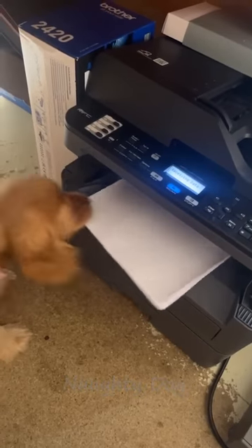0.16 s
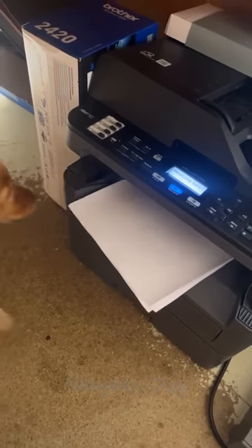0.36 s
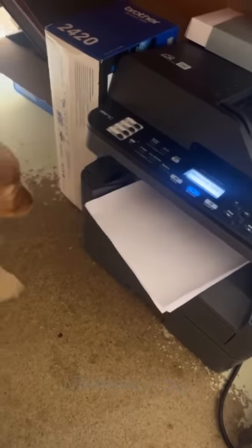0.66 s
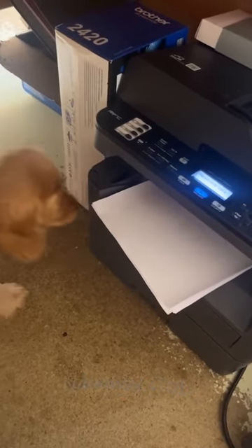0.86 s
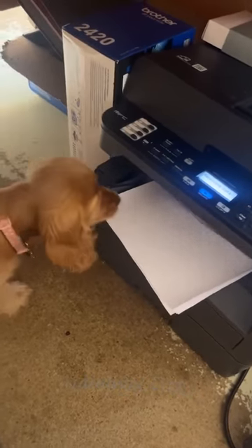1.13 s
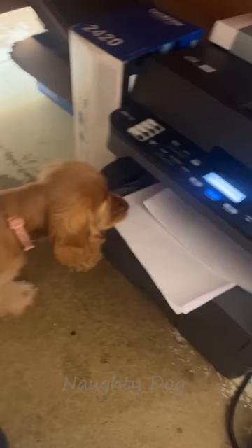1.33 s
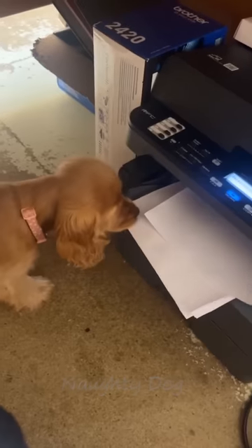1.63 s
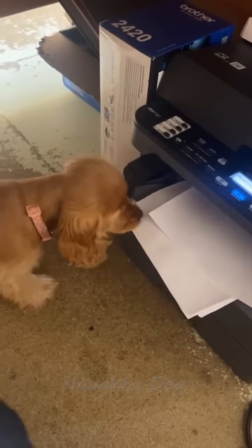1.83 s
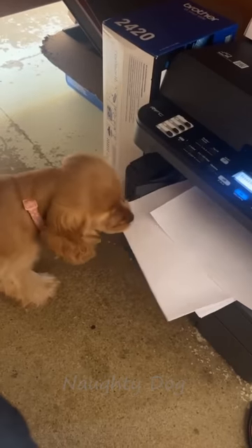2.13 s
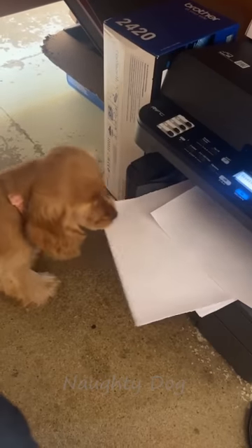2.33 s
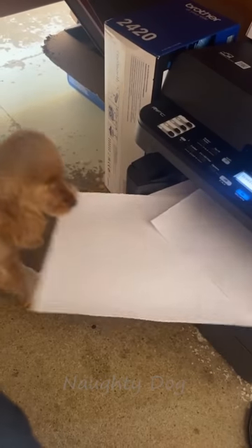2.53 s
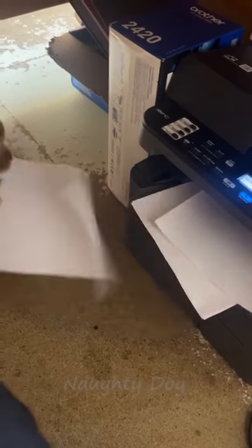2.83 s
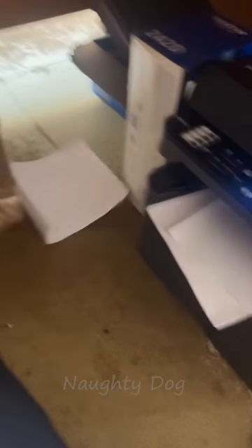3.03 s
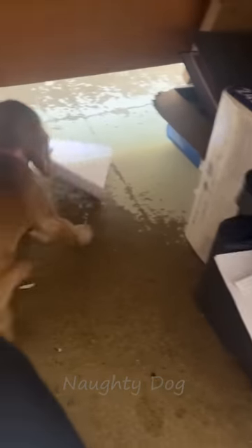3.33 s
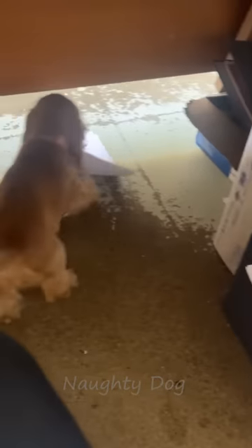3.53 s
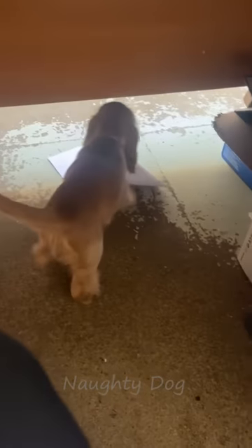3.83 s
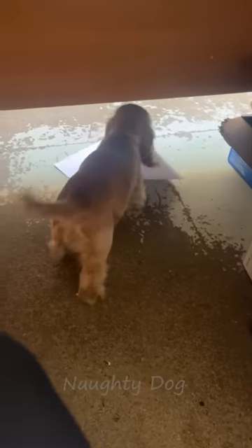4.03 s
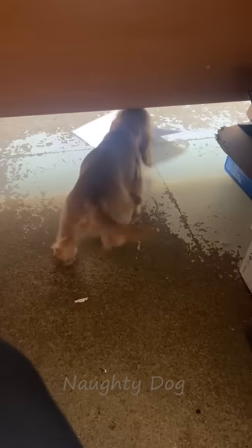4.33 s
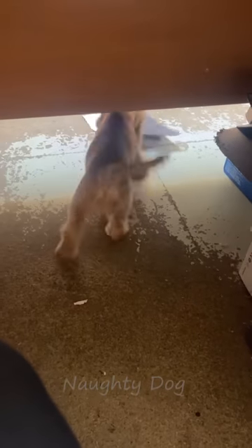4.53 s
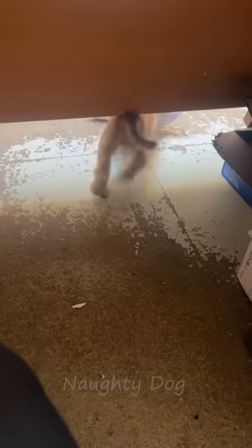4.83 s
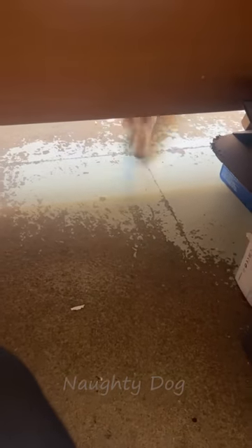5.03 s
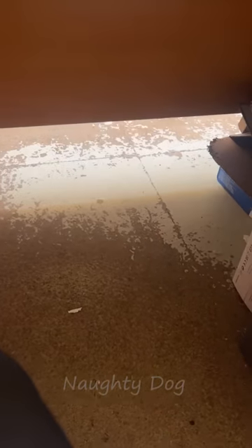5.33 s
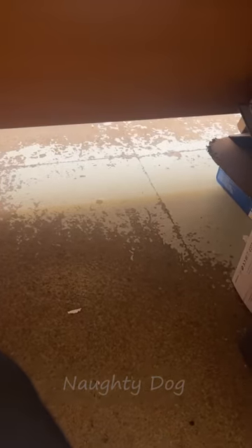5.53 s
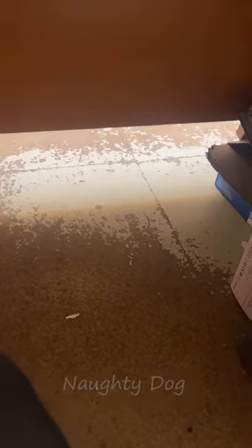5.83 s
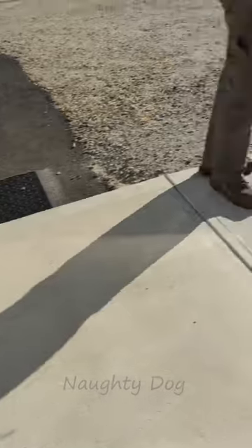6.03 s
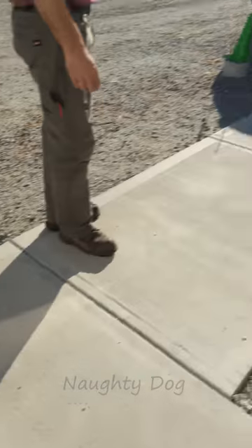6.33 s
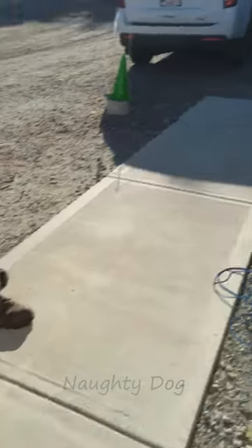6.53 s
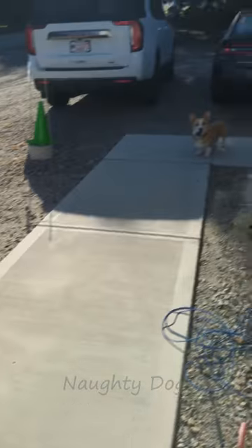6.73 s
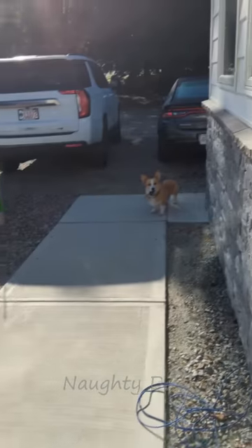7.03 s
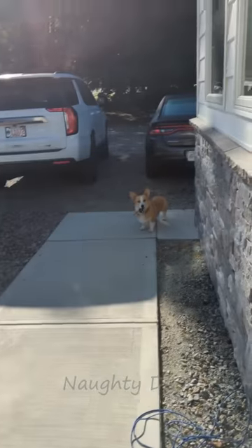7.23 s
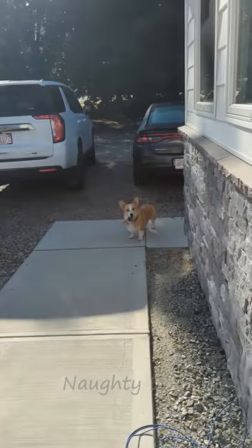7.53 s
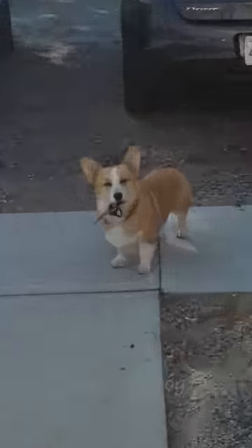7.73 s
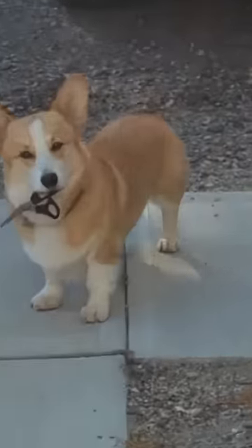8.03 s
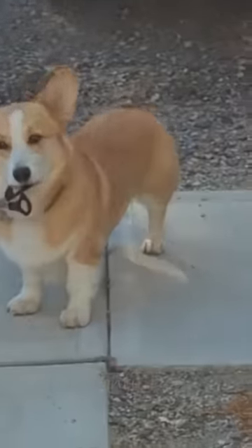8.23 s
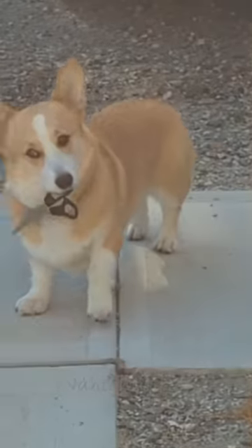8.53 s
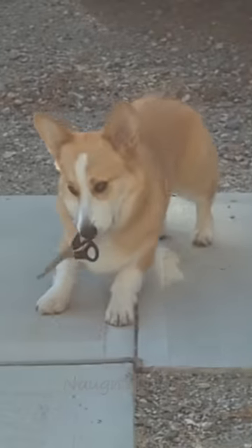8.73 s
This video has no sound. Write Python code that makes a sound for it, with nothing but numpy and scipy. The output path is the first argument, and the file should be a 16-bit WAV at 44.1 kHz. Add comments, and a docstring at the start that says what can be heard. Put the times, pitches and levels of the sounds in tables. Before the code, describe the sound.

From 0 to 6 s, a printer runs close by in a small hard room: a low, unsteady motor hum, casing rumble, fan air and wavering treble hiss, in mono. Over it, paper rasps and slaps in a hollow plastic tray: a quick scrape and clatter at 0.3 s, more at 0.85 to 1.2, a drier rasp at 1.5 to 1.7, soft rubbing and a dull bump around 2, light slides near 2.7. A very sharp tick at 2.9 briefly ducks everything. Clacks follow at 3.4 and 3.6, stronger at 3.75 and 4.25, the last with a lower knock; then mainly hum, slightly weaker, with a faint brush at 5.2. At 5.96 it cuts to quiet, wide stereo driveway air: faint gliding bird whistles from 6.05 to 6.5, a gritty scuff at 6.45, a soft thump at 6.9. An engine's low idle and whirring air swell, jumping fuller around 7.4 and loudest from 8 to 8.8.

```python
"""Puppy at the printer tray, then a driveway

An office printer hums and blows in a small hard room: drifting tones over coloured noise.
Sheets rasp and slap in its plastic tray as a puppy tugs one out: stick-slip noise and short damped modes.
One sharp tick right by the microphone makes the limiter duck.
Then a cut to a driveway: a far bird whistles in glides, and a faint engine rumble grows as the camera zooms in.
"""
import sys
import numpy as np
from scipy import signal
from scipy.fft import rfft, irfft, next_fast_len
from scipy.io import wavfile
from scipy.ndimage import uniform_filter1d, minimum_filter1d, map_coordinates

SR = 44100
rng = np.random.default_rng(int(sys.argv[2]) if len(sys.argv) > 2 else 0)


def bounce(signal):
    """Save signal as a 16-bit WAV file at the path given by the first command-line argument."""
    frames = np.transpose(np.atleast_2d(signal))
    limited = np.clip(frames, -1, 1)
    pcm = np.round(limited * 32767).astype(np.int16)
    wavfile.write(sys.argv[1], SR, pcm)


N = 391608
CUT_S, ZOOM_S = 5.957, 7.33  # the cut from the room to the driveway; the start of the zoom there


def amp(db):
    """Decibels to gain."""
    return 10 ** (np.asarray(db) / 20)


def unit(x):
    """Scale to rms 1."""
    return x / np.sqrt(np.mean(np.abs(x) ** 2) + 1e-20)


def clock():
    """The time of every sample in seconds."""
    return np.arange(N) / SR


def since_cut():
    """Seconds spent on the driveway, zero before the cut."""
    return np.maximum(clock() - CUT_S, 0)


def along(points, hz):
    """Read (Hz, value) points on a log frequency axis."""
    f, v = np.transpose(points)
    return np.interp(np.log(hz + 1), np.log(f + 1), v)


def curve(points):
    """Read (s, value) points at every sample."""
    s, v = np.transpose(points)
    return np.interp(clock(), s, v)


def wobble(rate):
    """A smooth random curve, rate knots a second."""
    knots = rng.standard_normal(int(N * rate / SR) + 4)
    return map_coordinates(knots, [clock() * rate])


def filtered(x, response):
    """x times a response of frequency."""
    m = next_fast_len(N + SR // 2)
    return irfft(rfft(x, m) * response(np.fft.rfftfreq(m, 1 / SR)), m)[..., :N]


def noise(spectrum):
    """Noise of rms 1 with the given colour."""
    return unit(filtered(rng.standard_normal(N), lambda hz: amp(along(spectrum, hz))))


def resonate(x, modes):
    """x through a body's resonances, which alternate in sign, at rms 1."""
    def body(f):
        total = 0
        for k, (centre, width, db) in enumerate(modes):
            damping = 1j * f * width
            total = total + (-1) ** k * amp(db) * damping / (centre * centre - f * f + damping)
        return total
    return unit(filtered(x, body))


def tone(hz, unsteady, rate):
    """A line of rms 1 at a fixed or moving pitch; a share of it drifts in strength and phase."""
    share = np.clip(unsteady, 0, 1)
    drift = np.sqrt(1 - share ** 2) + share * unit(wobble(rate) + 1j * wobble(rate))
    turns = np.cumsum(hz * np.ones(N)) / SR + rng.random()
    return unit(np.real(drift * np.exp(2j * np.pi * turns)))


def walls(x, count=12):
    """Near walls add weak early copies, which ripple the spectrum of a steady sound."""
    share, span_s = 0.3, 0.03  # strength of all copies together; the latest possible copy
    copies = [rng.choice([-1, 1]) * np.roll(x, int(SR * span_s * u)) for u in rng.uniform(.15, 1, count)]
    return x + share * sum(copies) / np.sqrt(count)


def bumps(rows):
    """Brief dull booms, each a low sine under a bell-shaped swell."""
    t = clock()
    total = np.zeros(N)
    for s, hz, db, half in rows:
        total += amp(db) * np.exp(-((t - s) / half) ** 2) * np.sin(2 * np.pi * hz * (t - s))
    return total


def patchy(x, depth_db):
    """Turbulence: random patches of gain, about 300 Hz wide and 70 ms long."""
    z = signal.stft(x, nperseg=1024)[2]
    field = uniform_filter1d(rng.standard_normal(z.shape), size=7, axis=0)
    field = uniform_filter1d(field, size=6, axis=1)
    return unit(signal.istft(z * amp(depth_db * unit(field)), nperseg=1024)[1][:N])


def rush(colour):
    """Coloured noise rippled by near walls and made patchy by turbulence."""
    return patchy(walls(walls(noise(colour))), depth_db=1.6)


def brightening(x):
    """A steep upper edge that climbs from the start of the zoom onwards."""
    start_hz, climb_hz_per_s = 2930, 380
    hz, t, z = signal.stft(x, SR, nperseg=1024)
    edge_hz = start_hz + climb_hz_per_s * np.maximum(t - ZOOM_S, 0)
    return unit(signal.istft(z / (1 + (hz[:, None] / edge_hz) ** 16), SR, nperseg=1024)[1][:N])


def opening():
    """Gain of the open air as it fades in after the cut."""
    return 1 - 0.93 * np.exp(-since_cut() / 0.12)


def layer_level(mean_db, follows, lift_db):
    """A layer's gain: its dB at the mean swell, dB per dB of swell, and dB lifted by the zoom."""
    # how the driveway's sound grows: t/s, level/dB (only the change from the mean counts)
    swell = [(6.0, -69.5), (6.72, -57), (7.35, -52.5), (8.15, -44), (8.52, -41.5), (8.8, -42)]
    swell_db = curve(swell)
    swell_db = swell_db - swell_db[since_cut() > 0].mean()
    zoomed = np.clip((clock() - ZOOM_S) / 0.082, 0, 1)
    return opening() * amp(mean_db + follows * swell_db + lift_db * zoomed)


def driveway_air():
    """Engine body, fan whirr and hiss as rushing noise, over the steady hush of the open air."""
    # colour of the engine's body: f/Hz, level/dB per Hz
    body = [(140, -41), (195, -1), (228, -5.5), (258, -17), (300, 0.5), (360, 0), (430, 0), (500, -4),
            (570, -7), (660, -2), (800, -3), (950, -4.5), (1080, -19), (1800, -49)]
    # colour of the whirr: f/Hz, level/dB per Hz
    whirr = [(520, -24.5), (630, 0.5), (790, -2), (940, 1.5), (1060, -2), (1210, 3.5), (1480, -0.5),
             (1680, 4), (1870, 0), (2000, 0), (2300, -7), (2500, -6.5), (3000, -11), (3800, -18),
             (5000, -40)]
    # colour of the hiss: f/Hz, level/dB per Hz
    hiss = [(2000, -4), (3000, 2), (3700, -0.5), (4300, 1), (5000, -3), (6500, 0), (7500, -6), (9000, -12),
            (12000, -23), (13200, -55)]
    # colour of the distant hush: f/Hz, level/dB per Hz
    distant = [(150, -8), (205, 14), (270, 9), (460, 0), (560, 13), (630, 1), (720, -11), (1100, -6),
               (1700, -5), (2400, -2.5), (3400, -12), (4500, -17), (7500, -35), (11000, -42)]
    air = layer_level(-51.5, follows=0.48, lift_db=0.9) * rush(body)
    air += layer_level(-52, follows=1.06, lift_db=0) * brightening(rush(whirr))
    air += layer_level(-64, follows=0.55, lift_db=3.8) * rush(hiss)
    return air + opening() * amp(-57) * noise(distant)


def far_hums():
    """Other hums swell and fade as the camera pans, each a drifting tone."""
    # the hums: f/Hz, level/dB at the loudest, t/s of the loudest, standard deviation of the bell/s
    hums = [(119, -55.5, 6.08, 0.44), (239, -58.5, 6.57, .45), (317.6, -57.5, 6.42, 0.52),
            (368, -57.5, 7.3, .3), (292, -56, 7.9, 0.27), (326, -47.5, 8.78, 0.11)]
    total = np.zeros(N)
    for hz, db, s, spread in hums:
        bell = np.exp(-((clock() - s) / spread) ** 2 / 2)
        total += amp(db) * bell * tone(hz, unsteady=0.39, rate=7.9)
    return total


def engine_note():
    """The engine's note creeps up to its idle."""
    # strength of the note, before a 1 dB cut: t/s, level/dB
    strength = [(6.0, -67), (6.3, -57), (6.65, -48.5), (7.4, -45), (8.05, -41.5), (8.55, -45.5),
                (8.88, -46.5)]
    start_hz, idle_hz, settle_s = 155.1, 166.4, 1.25
    engine_hz = idle_hz + (start_hz - idle_hz) * np.exp(-since_cut() / settle_s)
    return amp(curve(strength) - 1.0) * tone(engine_hz, unsteady=0.25, rate=13)


def exhaust():
    """Low rumbling noise with one throbbing line in it."""
    # level of the rumble: t/s, level/dB
    strength = [(6.0, -60), (6.3, -58), (6.9, -58), (7.33, -54), (7.48, -44), (8.3, -44), (8.8, -37)]
    # colour of the rumble: f/Hz, level/dB per Hz
    low = [(25, -26), (48, -14), (62, 5), (78, 2.5), (98, -5), (120, -7), (140, -8.5), (185, -8),
           (215, -16), (260, -28), (500, -66)]
    throb = amp(-7) * tone(122.7, unsteady=0.71, rate=8)
    return amp(curve(strength) + 1.1 * wobble(12)) * (noise(low) + throb)


def engine_drone():
    """Noise through narrow resonances in the engine's wash, lifted strongly by the zoom."""
    # the resonances: f/Hz, width/Hz, level/dB
    modes = [(457, 42, 1), (703, 34, 4.5), (952, 40, -6.5), (1250, 60, -2.5), (1417, 60, -6),
             (1690, 200, -8.5)]
    source = noise([(250, -30), (400, 0.5), (2000, -3.0), (3000, -30)])
    return layer_level(-66.5, follows=0.44, lift_db=19.1) * resonate(source, modes)


def scuff():
    """A shoe shifts on grit: a faint scrape of clumpy noise that dies away."""
    # the scrape: t/s, level/dB, t60/s
    s, db, t60 = (6.461, -60, 0.38)
    # colour of the grit: f/Hz, level/dB per Hz
    grit = [(1500, -22), (4500, 1), (8000, -8), (12500, -10), (14000, -36)]
    t = clock() - s
    return (t > 0) * amp(db - 60 * np.abs(t) / t60) * unit(noise(grit) * amp(3 * wobble(200)))


def bird():
    """Faint short whistles from far off, each one glide."""
    # the whistles: t/s, length/s, start f/Hz, end f/Hz, level/dB
    chirps = [(6.06, .05, 3450, 3100, -70), (6.105, .06, 3380, 3680, -66), (6.29, .11, 2250, 2650, -62),
              (6.46, .045, 3150, 3550, -63)]
    song = np.zeros(N)
    for s, length, start_hz, end_hz, db in chirps:
        u = np.clip((clock() - s) / length, 0, 1)
        glide_hz = start_hz + (end_hz - start_hz) * u
        song += amp(db) * np.sin(np.pi * u) * np.sin(2 * np.pi * np.cumsum(glide_hz) / SR)
    return song


def driveway():
    """An idling engine swells in stereo; the bass is nearly mono, the rushing air wide."""
    # soft thumps on the driveway: t/s, f/Hz, level/dB, half length to 1/e /s
    thumps = [(6.9, 120, -44.5, 0.02), (6.125, 57, -43, 0.029)]
    # stereo width of the air: f/Hz, side minus mid level/dB
    side_balance = [(100, -26), (220, -21), (400, -4), (700, 0), (1300, -3), (2400, 3), (8000, -0.5)]
    air, independent_air = driveway_air(), driveway_air()
    engine = engine_drone() + exhaust() + engine_note()
    mid = air + engine + far_hums() + scuff() + bird() + bumps(thumps)
    side = filtered(independent_air, lambda hz: amp(along(side_balance, hz)))
    return filtered(np.array([mid + side, mid - side]), lambda hz: hz < 13000)


def printer():
    """Unsteady motor tones over casing rumble, fan air and a treble hiss that rises and falls."""
    # motor and panel tones: f/Hz, level/dB, unsteadiness 0-1, loss/dB once the camera has turned away
    motor_tones = [(37.6, -30.3, 0.5, -0.5), (75.5, -37.5, 0.7, 0.5), (112.2, -31, 0.54, 0),
                   (121.2, -36, 0.94, -0.5), (147, -43, 0.9, 0.5), (184.2, -35.5, 0.6, 7),
                   (202.2, -43, 0.6, 1.5), (229.4, -37.5, 0.52, 0.5), (257.8, -39.5, 0.52, -0.5),
                   (451, -45, 0.6, 0), (659, -48.5, 0.7, 1), (1013, -52.5, 0.5, 3), (1134, -52.5, 0.4, 2),
                   (1350, -48.5, .95, 5)]
    # colour of the casing's rumble: f/Hz, level/dB per Hz
    rumble_colour = [(22, -13.5), (36, 1), (55, 2.5), (90, 3), (125, 6), (165, 4.5), (210, 2), (285, 5.5),
                     (325, -7), (400, -12), (600, -81)]
    # colour of the fan's air: f/Hz, level/dB per Hz
    air_colour = [(200, -29), (340, -2.5), (430, 6), (520, 1.5), (670, 3.5), (800, 0.5), (1180, -0.5),
                  (1330, 3.5), (1560, 1), (1850, -2), (2200, -7), (3200, -15), (6000, -82.5)]
    # colour of the treble hiss: f/Hz, level/dB per Hz
    hiss_colour = [(1200, -28.5), (2200, -1), (2800, 1), (4100, 0.5), (4900, -7.5), (5700, -15.5),
                   (7900, -17), (8600, -54.5), (13300, -66), (14200, -18.5), (15800, -24)]
    # strength of the fan's air: t/s, level/dB
    fan = [(0.0, -28.5), (0.87, -30.5), (1.0, -27.5), (2.78, -31.5), (3.49, -28.5), (5.1, -33.5),
           (5.65, -32.5), (5.8, -32.5)]
    # course of the treble hiss, before an 11 dB lift: t/s, level/dB
    treble = [(0.0, -54), (0.85, -53.5), (0.96, -50.5), (1.15, -49.5), (1.28, -52.5), (2.07, -52),
              (2.41, -49), (2.54, -53), (2.72, -49), (3.0, -51.5), (3.34, -50), (3.74, -53.5), (4.16, -52),
              (4.36, -51.5), (4.77, -57), (5.59, -55), (5.72, -50), (5.8, -52), (5.82, -50.5)]
    fan_db = curve(fan)
    turned = np.clip((clock() - 4.22) / 0.7, 0, 1)  # the camera turns from the printer
    hum = np.zeros(N)
    for hz, db, unsteady, lost_db in motor_tones:
        hum += amp(db - lost_db * turned) * tone(hz, unsteady, rate=13)
    fan_change_db = fan_db - fan_db[clock() < CUT_S].mean()
    rumble = amp(-30.5 + 0.3 * fan_change_db + 1.3 * wobble(7)) * noise(rumble_colour)
    air = amp(fan_db + 0.27 * wobble(30)) * unit(walls(noise(air_colour)))
    hiss = amp(curve(treble) + 11 + 0.59 * wobble(40)) * unit(walls(noise(hiss_colour)))
    return hum + rumble + air + hiss


def room(x):
    """Each frequency of the walls' answer dies at its own speed, starting 10 ms late."""
    # the room's decay: f/Hz, t60/s
    decay = [(150, 0.34), (1500, 0.24), (8000, 0.27)]
    hz, t, z = signal.stft(rng.standard_normal(SR // 2), SR, nperseg=256)
    tail = signal.istft(z * amp(-60 * t / along(decay, hz)[:, None]), SR, nperseg=256)[1]
    return signal.fftconvolve(x, np.pad(tail / np.linalg.norm(tail), (SR // 100, 0)))[:N]


def tick():
    """A hard tap next to the microphone: one heavily damped swing and a short crack."""
    # the tap: t/s, level/dB of the damped sines
    s, db = (2.8862, 2.5)
    t = np.maximum(clock() - s, 0)
    swing = np.sin(2 * np.pi * 1050 * t) * np.exp(-t / 0.00046)
    crack = np.sin(2 * np.pi * 2600 * t) * np.exp(-t / 0.00043)
    crack -= .8 * np.sin(2 * np.pi * 4100 * t) * np.exp(-t / 0.00035)
    return amp(db) * filtered(1.55 * swing - crack, lambda hz: 1 / (1 + (hz / 7200) ** 8))


def slaps():
    """The stack's edge slaps the tray: paper cracks, damped modes ring, never twice alike."""
    # the slaps, low ones on the casing: t/s, f/Hz, level/dB, t60/s, crack level/dB relative to the slap
    hits = [(0.2894, 1780, -9, .035, -9.5), (0.2982, 1440, -6.5, .035, -21),
            (0.3282, 1515, -7.5, .024, -20), (.8485, 1590, -6.5, 0.025, -15.5),
            (0.9289, 1298, -9, .035, -11.5), (1.2119, 1548, -7.5, 0.042, -13.5),
            (1.5133, 1400, -12, .04, -27), (1.974, 1177, -12.5, .035, -24),
            (3.4057, 1390, -8.5, 0.042, -17), (3.421, 1424, -10.5, 0.035, -12),
            (3.582, 1460, -10.5, 0.026, -20), (3.7632, 1537, -1.5, 0.033, -11),
            (3.772, 1368, -2, .033, -22), (4.243, 1765, -6.5, 0.028, -12), (4.2621, 1336, -2, 0.029, -22),
            (4.2765, 732, -9, .045, -25), (4.2895, 674, -9, .05, -25.5)]
    # modes of one slap: multiple of its pitch, level/dB
    slap_modes = [(.55, -16), (0.829, -5.5), (1, -0.5), (1.27, -8.5), (1.9, -26.5)]
    # colour of the paper's own snap: f/Hz, level/dB per Hz
    crack_colour = [(1500, -17.5), (2700, 4), (4000, -7), (5000, -22), (7000, -53), (9000, -95)]
    rise_s, crack_t60_s = 0.0016, 0.024  # the plastic takes a moment to ring up
    out = np.zeros(N)
    t = clock()[:SR // 8]
    snap = noise(crack_colour)
    multiple, mode_db = np.transpose(slap_modes)[:, :, None]
    for s, hz, db, t60, crack_db in hits:
        span = slice(round(s * SR), round(s * SR) + len(t))
        scatter_db = 1.0 * rng.standard_normal((len(slap_modes), 1))
        modes = np.sum(amp(mode_db + scatter_db) * np.sin(2 * np.pi * hz * multiple * t), axis=0)
        crack = amp(crack_db - 60 * t / crack_t60_s) * snap[span]
        out[span] += amp(db) * (1 - np.exp(-t / rise_s)) * (modes * amp(-60 * t / t60) + crack)
    return out


def slips(grain_db):
    """Stick-slip friction: noise that comes in dense uneven clumps."""
    return unit(amp(grain_db * wobble(420)) * rng.standard_normal(N))


def paper():
    """Each stroke swells and dies; its slips ring tray and sheet, knock the casing, crinkle and hiss."""
    # strokes in the tray: t/s, level/dB (before a common 2 dB cut), swell/s, t60/s,
    # then relative to the stroke: knock level/dB, crinkle level/dB, edge hiss level/dB; sheet f/Hz
    strokes = [(0.257, -34.5, 0.0099, 0.094, -4, 4.5, -6, 1710),
               (.287, -15, 0.008, .085, -5.5, -19, -26.5, 1668),
               (0.33, -19.5, .001, 0.3, 1, -19, -17.5, 1495),
               (0.456, -29.5, 0.017, .45, -2.5, -6.5, -8.5, 1295),
               (.843, -16.5, 0.0022, 0.28, -3, -19.5, -16, 1640),
               (.909, -18.5, 0.024, .13, 2.5, -15.5, -17, 1340),
               (1.07, -28.5, 0.0086, .08, 3.5, -1.5, -13, 1746), (1.13, -39, 0.034, .3, -6.5, -4, 0, 1500),
               (1.189, -16, 0.028, 0.16, -3, -16, -16.5, 1550),
               (1.218, -22.5, .012, 0.24, 4, -11, -6, 1376), (1.512, -20, .004, 0.05, -2, -22, -22, 1356),
               (1.628, -22.5, 0.028, 0.51, -3, -13, -13, 1546),
               (1.973, -32, .0012, 0.023, 8, -17, -12, 1204),
               (2.05, -31.5, 0.028, 0.075, -6, -16, -11, 1505),
               (2.221, -29, 0.0055, .087, -16, -13, -9, 1330), (2.66, -26.5, .02, 0.26, 1, -13, -7, 1586),
               (2.795, -27, 0.012, 0.18, 1.5, -13, -11, 1500),
               (3.021, -30.5, 0.017, 0.13, 4, -5, -11, 1325),
               (3.201, -28, 0.023, 0.22, 3.5, -13, -10.5, 1404),
               (3.402, -20, 0.016, 0.25, -13, -8, -10.5, 1480),
               (3.581, -25.5, .002, 0.071, 5.5, -9, -10, 1480),
               (3.74, -27.5, .012, .1, -14, -9.5, -15.5, 2016),
               (3.761, -16.5, .008, 0.18, -3, -9.5, -14, 1432),
               (3.985, -31, 0.024, 0.16, 1.5, -3, -5.5, 1505),
               (4.242, -21.5, 0.003, 0.08, -5, -13, -19, 1925), (4.272, -16, 0.01, 0.19, -2, -13, -20, 688),
               (5.17, -40, 0.059, 0.41, -9.5, -0.5, -0.5, 1480)]
    # the tray's resonances: f/Hz, width/Hz, level/dB
    tray_modes = [(1330, 230, -0.5), (1560, 330, 0.5), (1904, 255, -1.5), (2760, 830, -18.5)]
    # the casing's resonances: f/Hz, width/Hz, level/dB
    casing_modes = [(443, 120, -6), (688, 91, 0), (970, 240, -6.5)]
    # colour of the crinkle: f/Hz, level/dB per Hz
    crinkle_colour = [(1700, -22.5), (2400, 0), (2900, 0.5), (3500, -10.5), (4200, -13), (5500, -24.5),
                      (8000, -46), (9000, -71)]
    # colour of the hiss at the sheet's edge: f/Hz, level/dB per Hz
    edge_colour = [(2200, -16), (3400, -1.5), (4350, -1.5), (4800, -7), (5300, -9.5), (6500, -21.5),
                   (8200, -18), (9000, -64.5)]
    ring, knock, crinkle, edge, sheet = np.zeros((5, N))  # the first four collect power
    t = clock()[:SR // 2]
    jitter = 1.1 * wobble(330)  # uneven slips smear the sheet's pitch
    for s, db, swell, t60, knock_db, crinkle_db, edge_db, sheet_hz in strokes:
        squeak_db = -0.5 - 7 * np.log2(t60 / 0.094)  # short jerks squeak most: 7 dB less per doubling
        stroke = amp(db - 60 * np.maximum(t - swell, 0) / t60) * np.minimum(t / swell, 1)
        span = slice(round(s * SR), round(s * SR) + len(t))
        ring[span] += stroke ** 2
        knock[span] += (stroke * amp(knock_db)) ** 2
        crinkle[span] += (stroke * amp(crinkle_db)) ** 2
        edge[span] += (stroke * amp(edge_db)) ** 2
        pitch = sheet_hz * (1 + .14 * (np.exp(-t / 0.0196) - .5))  # sinks as the sheet slackens
        squeak = np.sqrt(2) * np.sin(2 * np.pi * np.cumsum(pitch) / SR + jitter[span])
        sheet[span] += stroke * amp(squeak_db) * squeak
    # paper is too soft to excite the top
    soft = filtered(slips(grain_db=2.2), lambda hz: 1 / (1 + (hz / 3300) ** 10))
    tray = np.sqrt(ring) * resonate(soft, tray_modes)
    dull = filtered(slips(grain_db=-0.5), lambda hz: 1 / (1 + (hz / 2000) ** 4))
    casing = np.sqrt(knock) * resonate(dull, casing_modes)
    crackle = np.sqrt(crinkle) * unit(noise(crinkle_colour) * amp(2.2 * wobble(400)))
    fizz = np.sqrt(edge) * unit(noise(edge_colour) * amp(2.2 * wobble(300)))
    grain = filtered(crackle + fizz, lambda hz: 1 / (1 + (hz / 8660) ** 20))
    return amp(-2.0) * (tray + casing + grain + sheet)


def scene():
    """Indoors in mono, then a 3.6 ms crossfade to the open air."""
    # dull bumps of the casing: t/s, f/Hz, level/dB, half length to 1/e /s
    casing_bumps = [(2.0, 39, -23, .05), (2.19, 116, -28, .06), (3.09, 113, -21, .05)]
    rasps = paper() + slaps()
    indoors = printer() + bumps(casing_bumps) + rasps + amp(-5.5) * room(rasps) + tick()
    inside = np.clip((CUT_S - clock()) / 0.0036, 0, 1)
    return inside * indoors + (1 - inside) * driveway()


def limiter(x, ceiling_db, release_db):
    """Peaks over the ceiling pull the gain down at once; it returns at release_db a second."""
    over = np.maximum(20 * np.log10(np.abs(x).max(axis=0) + 1e-9) - ceiling_db, 0)
    ramp = release_db * clock()
    cut_db = np.maximum.accumulate(over + ramp) - ramp
    # hold the lowest gain around each peak, then smooth its corners
    return x * uniform_filter1d(minimum_filter1d(amp(-cut_db), size=65), size=33)


def record(dry):
    """The camera limits peaks and keeps nothing above its band limit."""
    return filtered(limiter(dry, ceiling_db=-2.2, release_db=100), lambda hz: hz < 15850)


dry = scene()
out = record(dry)
bounce(out)
```